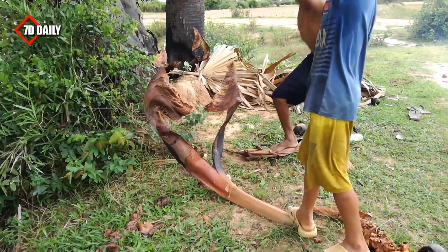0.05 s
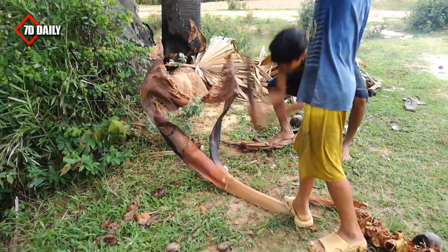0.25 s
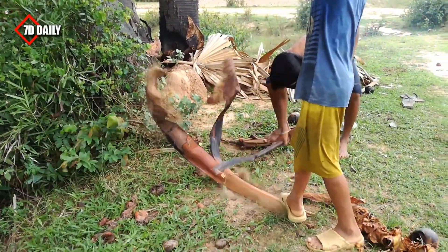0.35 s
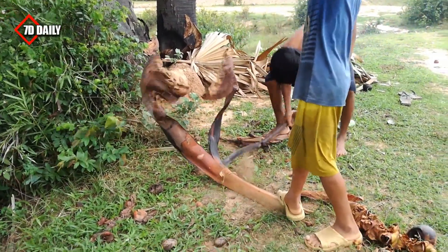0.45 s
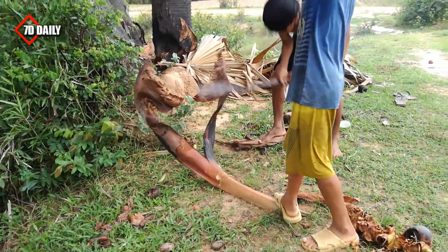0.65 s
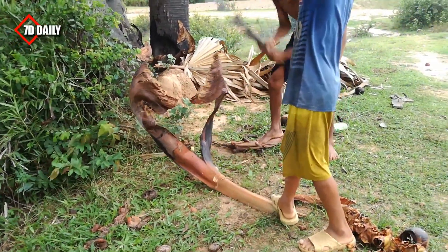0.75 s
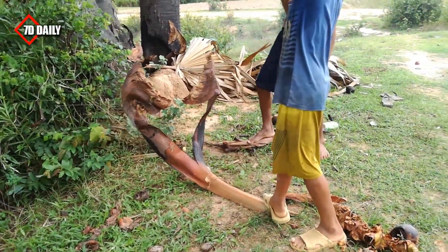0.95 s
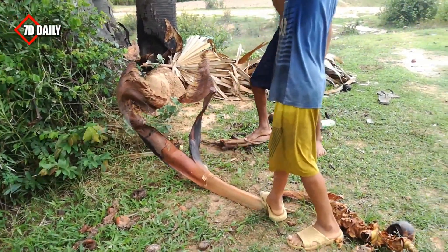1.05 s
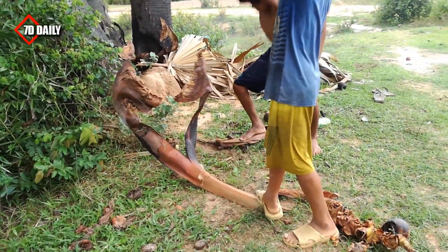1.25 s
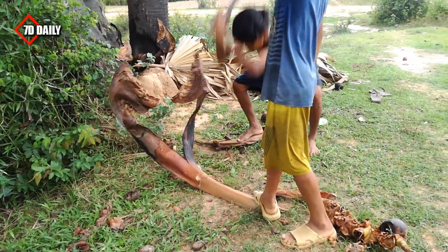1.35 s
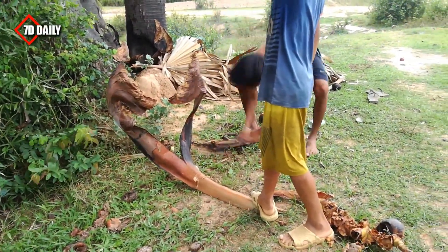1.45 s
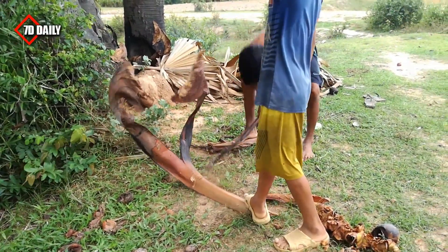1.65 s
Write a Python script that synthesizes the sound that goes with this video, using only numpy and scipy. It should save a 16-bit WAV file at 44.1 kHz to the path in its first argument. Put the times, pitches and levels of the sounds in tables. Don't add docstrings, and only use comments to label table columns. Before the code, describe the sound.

Two hard knife blows on a palm stalk lying on grass, the first sharper, the second softer and woodier; short scatter from bushes, crackling leaves, and low wind flutter on a nearby stereo camera microphone.

```python
import sys
import numpy as np
from scipy import signal
from scipy.fft import rfft, irfft, next_fast_len
from scipy.io import wavfile
from scipy.ndimage import uniform_filter1d, map_coordinates

SR = 44100
rng = np.random.default_rng(int(sys.argv[2]) if len(sys.argv) > 2 else 0)


def attenuation_scalar(level_db):
    decades = np.asarray(level_db, float) / 20
    return 10 ** decades


def store_pcm(level_fs):
    pcm = np.round(np.clip(level_fs, -1, 1) * 32767).astype(np.int16)
    wavfile.write(sys.argv[1], SR, np.atleast_2d(pcm).T)


N = 74970


def unit(x):
    return x / np.sqrt(np.mean(x ** 2) + 1e-20)


def peak(x):
    return x / np.abs(x).max()


def along(points, hz):
    f, value = np.transpose(points)
    return np.interp(np.log(hz + 1), np.log(f + 1), value)


def closed(points):
    below, above = (points[0][0] / 2, -120), (points[-1][0] * 2, -120)
    ends = [below] + list(points) + [above]
    return lambda hz: attenuation_scalar(along(ends, hz))


def wobble(rate):
    knots = rng.standard_normal(int(N * rate / SR) + 4)
    return map_coordinates(knots, [np.arange(N) * rate / SR])


def filtered(x, response):
    size = x.shape[-1]
    m = next_fast_len(size + 8192)
    spectrum = rfft(x, m) * response(np.fft.rfftfreq(m, 1 / SR))
    return irfft(spectrum, m)[..., :size]


def pair(size, apart):
    mid, side = rng.standard_normal((2, size))
    side = filtered(side, lambda f: apart * (1 + 1j * f / 3000) / (1 + 1j * f / 6000))
    return np.array([mid + side, mid - side])


def add(out, x, s):
    i = round(s * SR)
    out[:, i:i + x.shape[1]] += x[:, :N - i]


def modes(table):
    def response(f):
        return sum(attenuation_scalar(db) * 1j * f * width / (centre ** 2 - f * f + 1j * f * width)
                   for centre, width, db in table)
    return response


def bell(s, length):
    return np.exp(-.5 * ((np.arange(N) / SR - s) / length) ** 2)


def push(t, s, length):
    return np.sin(np.pi * np.clip((t - s) / length, 0, 1)) ** 2


# time_s, level_db
BREEZE_STRENGTH = [(0.0, -46), (0.596, -42.5), (0.686, -42.5), (0.828, -47.5), (1.05, -45), (1.202, -49.5),
                   (1.406, -54), (1.566, -39), (1.7, -49)]
# pitch_hz, level_db
EDDY_COLOUR = [(12, -40), (20, -20), (59, -10.5), (75, -16), (168, -16), (406, -39), (800, -55),
               (1040, -88), (1760, -120)]
# centre_s, length_s, level_db, brightest_hz
PUFFS = [(0.002, 0.024, -36, 410), (0.044, 0.0039, -26.5, 637), (0.077, 0.008, -29.5, 486),
         (0.117, 0.016, -41, 346), (0.147, 0.0086, -35.5, 407), (0.338, 0.023, -33.5, 284),
         (0.36, 0.0013, -23, 624), (0.381, .005, -31.5, 555), (0.391, 0.012, -28.5, 700),
         (0.446, .012, -35.5, 485), (0.49, .006, -33, 400), (0.548, .004, -40, 600),
         (0.586, 0.0097, -23.5, 633), (.596, 0.0037, -28.5, 1100), (0.608, 0.0025, -20, 1280),
         (0.622, 0.0018, -28, 1270), (0.66, 0.0014, -23.5, 926), (0.672, 0.015, -31, 503),
         (0.72, 0.0062, -25, 710), (0.742, 0.0043, -31.5, 819), (0.775, 0.018, -34.5, 446),
         (0.821, 0.019, -35.5, 394), (0.832, .003, -25, 840), (0.865, 0.0083, -39, 559),
         (1.111, 0.011, -33.5, 510), (1.135, 0.0093, -31, 660), (1.189, 0.012, -40.5, 453),
         (1.59, 0.0033, -38.5, 400.7), (1.621, 0.0046, -31.5, 580), (1.685, 0.016, -37.5, 403)]
# start_s, end_s
LEFT_FIRST = [(0, 0.12), (0.339, 0.49), (.645, .77), (1.092, 1.46)]


def breeze():
    lumpy_db, apart, port_lag_s = 2.5, .13, .0009
    puff_low_hz, tilt_db = 110, -5
    t = np.arange(N) / SR
    rumble = unit(filtered(pair(N, apart), closed(EDDY_COLOUR)))
    strength_db = np.interp(t, *np.transpose(BREEZE_STRENGTH))
    wind = attenuation_scalar(strength_db + lumpy_db * wobble(23)) * rumble

    for s, length, db, top_hz in PUFFS:
        def shape(f):
            octaves = np.log2(1 + (f / puff_low_hz) ** 2)
            slope = attenuation_scalar((tilt_db - 6) / 2 * octaves)
            return f / puff_low_hz * slope * np.exp(-(f / top_hz) ** 3)

        puff = filtered(pair(N, apart), shape) * bell(s, length)
        wind += attenuation_scalar(db) * unit(puff) * np.sqrt(length * SR / N)

    spells = sum((t >= start) * (t < end) * 1. for start, end in LEFT_FIRST)
    left = uniform_filter1d(spells, size=600)
    late = np.roll(wind, round(port_lag_s * SR), axis=1)
    first = np.array([left, 1 - left])
    return first * wind + (1 - first) * late


# pitch_hz, level_db
HISS_COLOUR = [(290, -34.5), (500, -8.5), (1450, -0.5), (2320, -7.5), (3110, -7), (5190, -10.5),
               (14700, -28.5), (16500, -31)]
# start_s, bite_db, stop_s (after the start), thud_db
CHOPS = [
    (.2430, -1.5, 0.003005, 5),
    (1.3955, -3.5, .0015, 3),
]


def hiss():
    level_db, duck_db, recover_s = -70.5, -4, .2
    gap_db, lead_s = -15, .016
    t = np.arange(N) / SR
    dip_db = np.zeros(N)
    for s, *_ in CHOPS:
        dip_db += duck_db * np.exp(-np.abs(t - s) / recover_s) * (t > s)
        dip_db += gap_db * (t > s - lead_s) * (t <= s)
    noise = unit(filtered(pair(N, .8), closed(HISS_COLOUR)))
    return attenuation_scalar(level_db + dip_db + wobble(8)) * noise


# centre_s, length_s, level_db, pitch_hz, width_hz
RUSTLES = [(.001, 0.00067, -52.5, 3000, 9100), (0.335, 0.0045, -58, 9000, 8000),
           (0.374, 0.035, -55, 1300, 1500), (0.38, 0.038, -57.5, 3800, 2280),
           (0.402, 0.0015, -63, 9000, 8000), (.460, 0.023, -59.5, 655, 540),
           (0.815, 0.038, -75, 4000, 2700), (2.3, 0.0065, -65, 1671, 1500),
           (1.222, 0.0023, -71, 1586, 1179), (1.536, .025, -60, 3144, 1244), (1.550, 0.072, -60, 670, 400),
           (1.558, 0.017, -68, 5000, 1500), (1.566, 0.016, -71, 10000, 8000)]


def rustles():
    out = np.zeros((2, N))
    for s, length, db, hz, width in RUSTLES:
        crackle = pair(N, .7) * attenuation_scalar(1.5 * wobble(300))
        leaf = unit(filtered(crackle, lambda f: np.exp(-.5 * ((f - hz) / width * 2) ** 2)))
        out += attenuation_scalar(db) * leaf * bell(s, length)
    return out


# pitch_hz, width_hz, level_db
STALK = [
    [(216, 128, -6.5), (414, 160.6, -5.5), (874, 110, -7), (1100, 160, -7), (1600, 200, -3),
     (2153, 200, -6.5), (2790, 300, -5), (3263, 281, -7), (3960, 150, -18), (4680, 220, -6)],
    [(185.8, 120, 2.5), (476.3, 61, -4.5), (698, 90, 3), (990, 150, 0.5), (1194, 57.4, 3), (1500, 430, 3),
     (2000, 67, -14.5), (2575, 454, 3), (3060, 370, -10), (4290, 200, -9), (4640, 600, -20)],
]
# pitch_hz, level_db
BUSH_COLOUR = [(150, -6.5), (400, 2.5), (1000, -1.5), (2000, -10), (4000, -11.5), (8000, -26),
               (12000, -30.5), (16000, -29.5)]
# pitch_hz, fade_s
BUSH_FADE = [(200, 0.17), (1000, 0.17), (4000, 0.17), (8000, 0.23), (13000, 0.18)]


def chops():
    strike_s, thud_s = .00028, .0008
    bite_t60_s, fibres_db, fibres_top_hz = .02, -4, 5420
    out, t = np.zeros((2, N)), np.arange(SR // 2) / SR
    for (s, bite_db, stop_s, thud_db), table, back_db in zip(CHOPS, STALK, (-19, -21)):
        body = modes(table)
        blow = push(t, strike_s / 2, strike_s) - .5 * push(t, 0, strike_s / 2)
        strike = peak(filtered(blow, body))
        fibres = pair(len(t), .5) * attenuation_scalar(-60 * t / bite_t60_s) * (t > 2 * strike_s)
        bite = peak(filtered(fibres, lambda f: body(f) * 1j * f / (1 + 1j * f / fibres_top_hz) ** 4))
        thud = peak(filtered(-push(t, stop_s, thud_s), body))
        add(out, attenuation_scalar(bite_db) * (strike + attenuation_scalar(fibres_db) * bite) + attenuation_scalar(thud_db) * thud, s)

        bushes = unit(filtered(pair(len(t), .55), closed(BUSH_COLOUR)))
        hz, when, z = signal.stft(bushes, SR, nperseg=256)
        fade = attenuation_scalar(-60 * when / along(BUSH_FADE, hz)[:, None])
        tail = signal.istft(z * fade, SR, nperseg=256)[1][:, :len(t)]
        add(out, attenuation_scalar(back_db) * tail * np.clip(t / 0.009, 0, 1), s)
    return out


# start_s, level_db, dullness_hz
KNOCKS = [
    (0.319, -24, 2000),
    (1.485, -32, 740),
    (1.611, -56, 937),
]
# pitch_hz, width_hz, level_db
GROUNDED = [(400, 120, -6), (930, 110, 2), (1400, 150, -2), (2300, 400, -10)]


def knocks():
    out, t = np.zeros((2, N)), np.arange(SR // 8) / SR
    body = modes(GROUNDED)
    for s, db, dull_hz in KNOCKS:
        contact = pair(len(t), 0.23) * attenuation_scalar(-60 * t / .03)
        knock = filtered(contact, lambda f: body(f) / (1 + 1j * f / dull_hz) ** 2)
        add(out, attenuation_scalar(db) * peak(knock), s)
    return out


# time_s, pitch_hz, level_db
BLADE_GLIDES = [
    [(.33, 1726, -66), (.37, 1746, -66), (0.422, 2000, -63), (.48, 1896, -69), (.53, 1880, -78),
     (.57, 1770, -90)],
    [(1.49, 1900, -60), (1.545, 1900, -62), (1.57, 2060, -65), (1.61, 2030, -85)],
]


def ring():
    width_hz = 260
    t, out = np.arange(N) / SR, np.zeros((2, N))
    for s, hz, db in map(np.transpose, BLADE_GLIDES):
        phase = 2 * np.pi * np.cumsum(np.interp(t, s, hz)) / SR
        fuzz = np.array([wobble(width_hz) * np.cos(phase) + wobble(width_hz) * np.sin(phase)
                         for _ in out])
        out += attenuation_scalar(np.interp(t, s, db, -140, -140)) * unit(fuzz)
    return out


def scene():
    return breeze() + hiss() + rustles() + chops() + knocks() + ring()


def roll_off(x):
    return signal.sosfilt(signal.butter(12, 16840, fs=SR, output="sos"), x)


def record(dry):
    ceiling, top_hz = .93, 15900
    held = dry / (1 + np.abs(dry / ceiling) ** 6) ** (1 / 6)
    mix = filtered(held, lambda f: 1 / (1 + (f / top_hz) ** 40))
    return roll_off(mix)


dry = scene()
out = record(dry)
store_pcm(out)
```